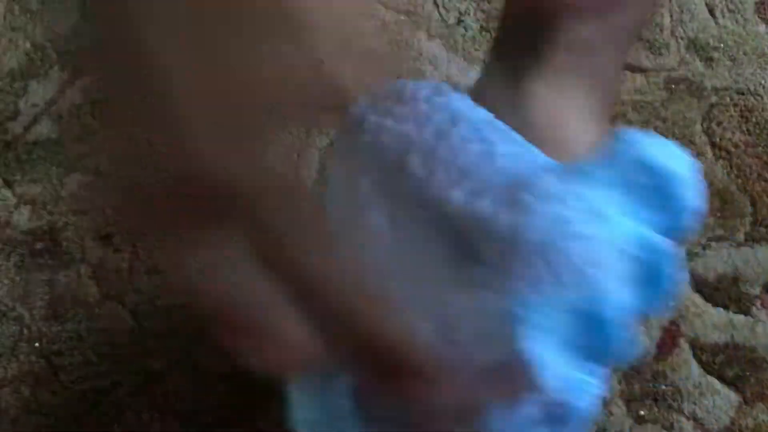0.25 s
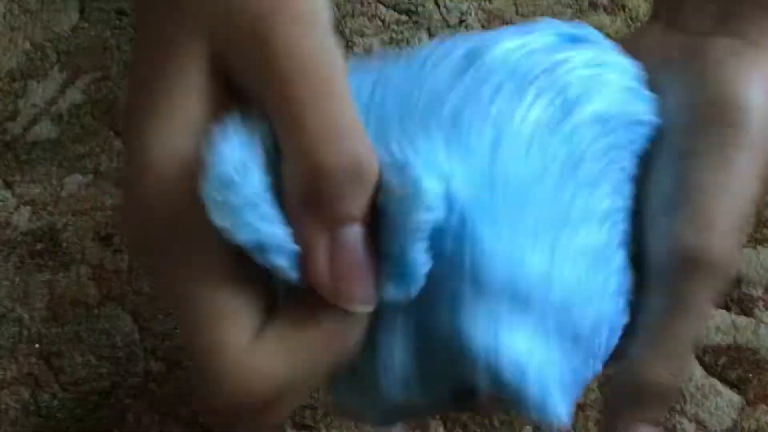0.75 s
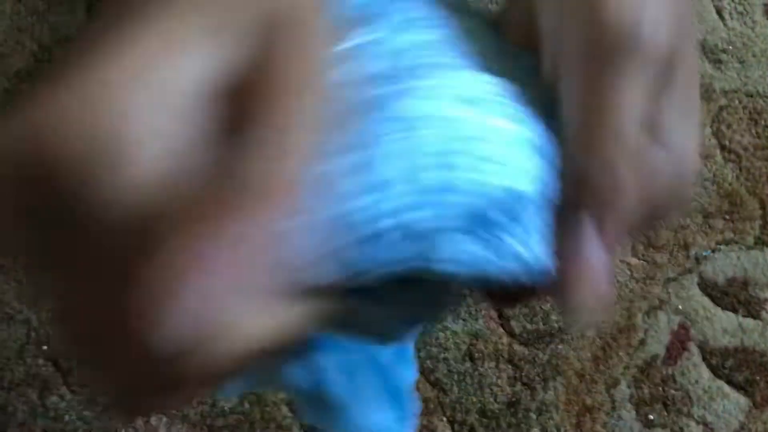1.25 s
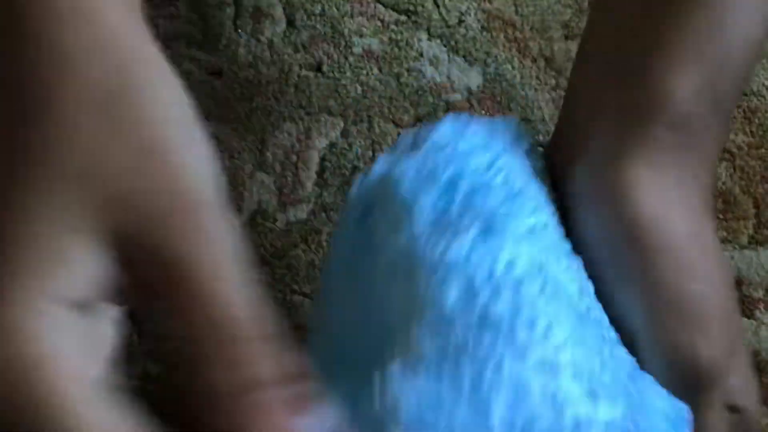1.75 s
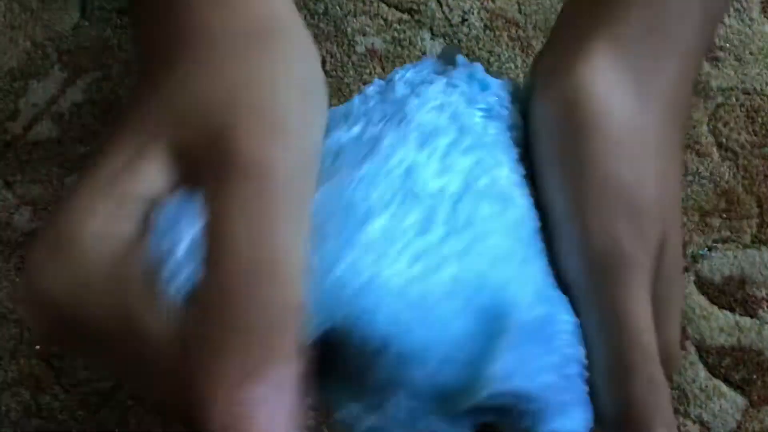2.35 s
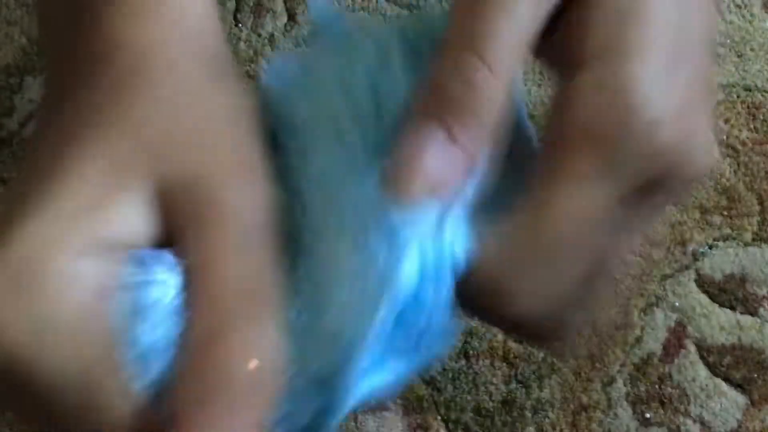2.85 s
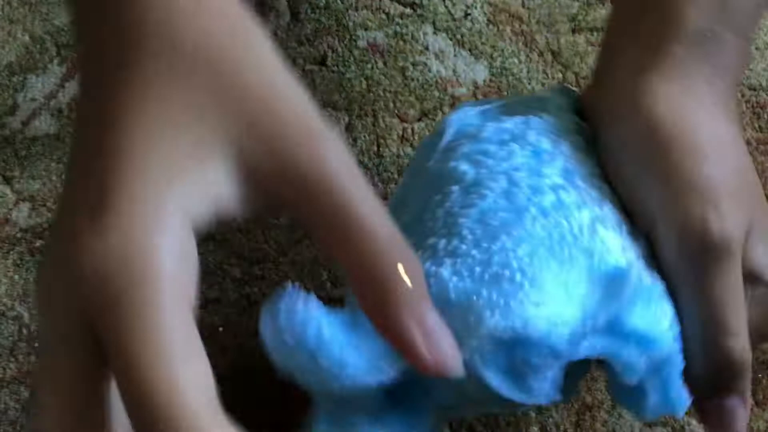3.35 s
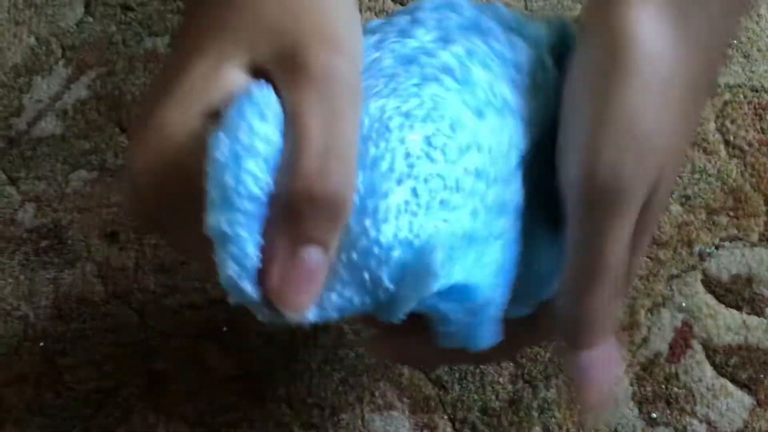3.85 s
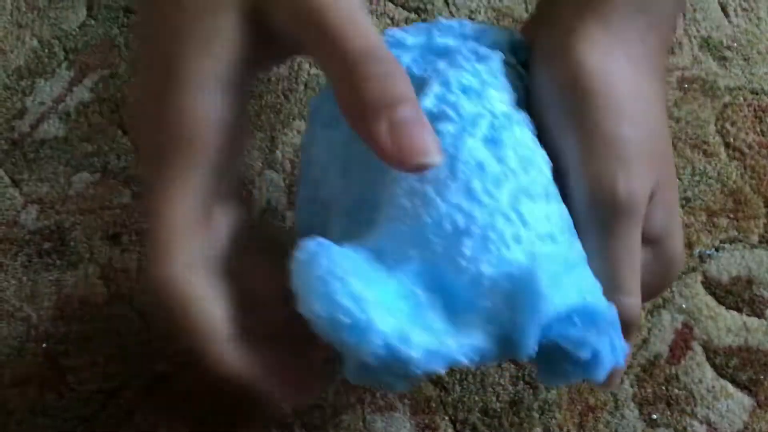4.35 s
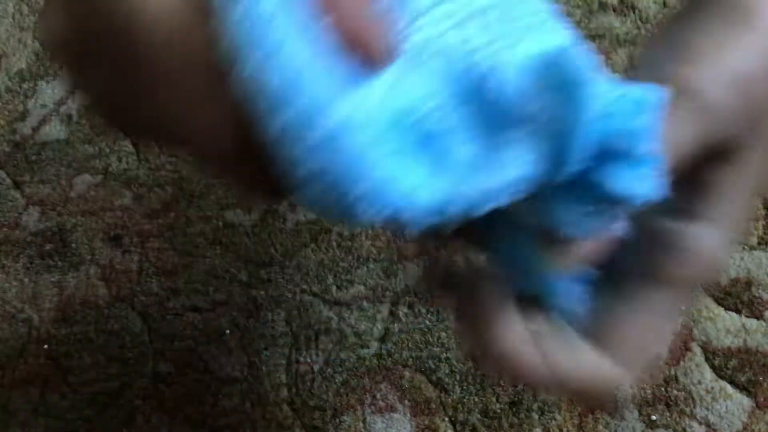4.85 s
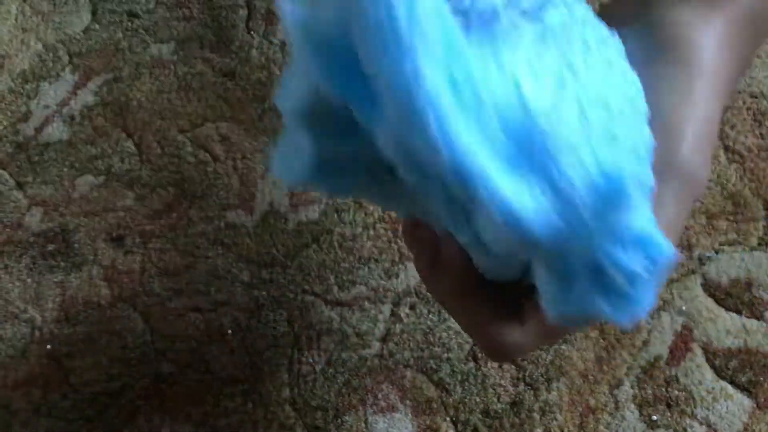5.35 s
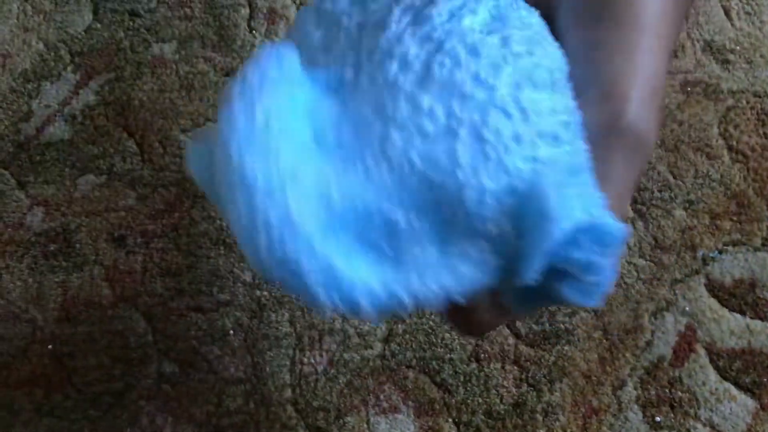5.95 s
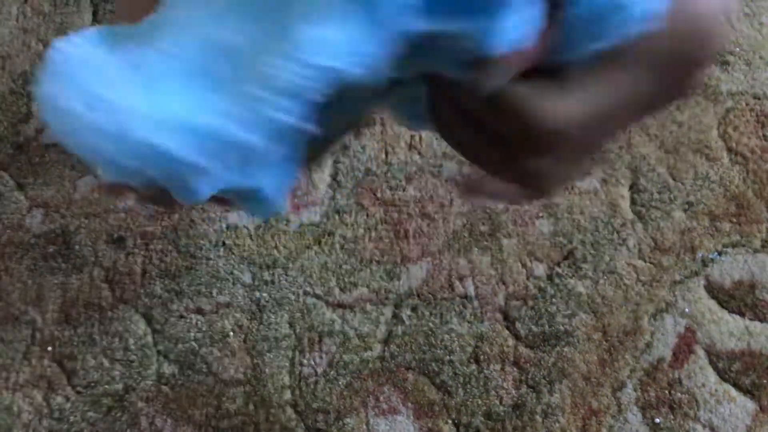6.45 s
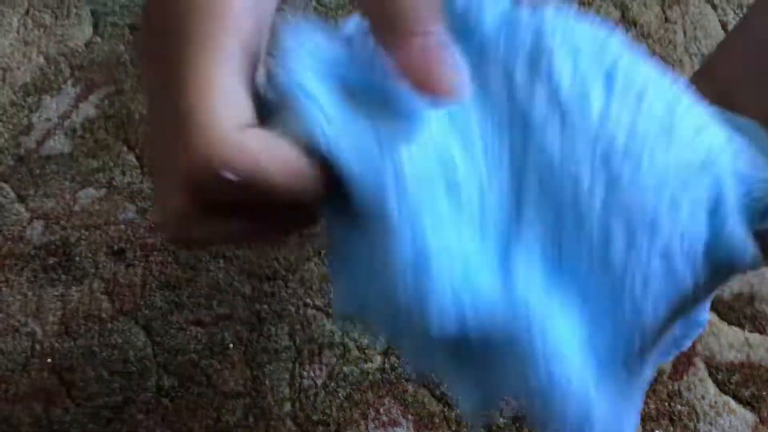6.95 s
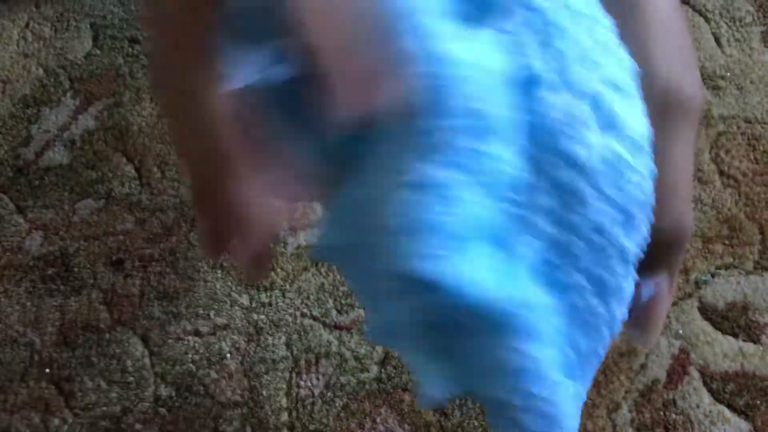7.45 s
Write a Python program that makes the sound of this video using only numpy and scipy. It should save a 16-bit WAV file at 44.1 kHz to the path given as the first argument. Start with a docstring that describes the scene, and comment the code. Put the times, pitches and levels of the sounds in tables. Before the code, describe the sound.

Close, dry sound of sticky beaded slime being kneaded in a small carpeted room. Each press swells and releases quickly as crackling hiss over wet, gulping squelch. Bright pops come singly and in rapid clusters, with one big air pocket plunging into bass. Later squeezes are softer, a near-still pause follows, then a fresh flurry of snaps fades into light peeling ticks over faint low room tone.

```python
"""A lump of foam slime is kneaded and folded by two hands on a carpet in a quiet room, close to the microphone.
Each squeeze tears many tiny foam cells: random clicks through filter bands crackle and fizz over a soft squelch of gulps.
Larger bubbles snap as filtered pulses with a noise rattle; fingers sinking in give dull, sagging blups.
Air pockets burst as falling sine notes, one big one ending in a deep thump; pinholes squeak. A low room tone runs on.
"""
import sys
import numpy as np
from scipy import signal
from scipy.fft import irfft
from scipy.io import wavfile

SR = 44100
rng = np.random.default_rng(int(sys.argv[2]) if len(sys.argv) > 2 else 0)


def wrap_up_sound(samples):
    """Save the sound to the file named by the first command line argument, as 16-bit audio."""
    columns = np.atleast_2d(samples).T
    # keep every value between -1 and 1, then stretch to whole-number steps
    tamed = np.clip(columns, -1, 1)
    steps = np.round(tamed * 32767).astype(np.int16)
    wavfile.write(sys.argv[1], SR, steps)


N = 340011

# presses and pulls of the hands (2.979: faint crackle around a pinhole squeak): (time of peak [s],
# nominal crackle level [dB], rise [s], release [s], nominal squelch re crackle [dB], nominal fizz re crackle [dB])
SQUEEZES = [(0.043, -50.5, 0.088, 0.11, -0.5, -7), (0.402, -42.5, 0.048, 0.013, 5, -8),
            (0.514, -42.5, 0.099, 0.084, -2.5, -2), (0.814, -44.5, 0.086, 0.049, 0, -7.5),
            (0.898, -50, 0.036, 0.068, -4.5, -6.5), (1.319, -41.5, 0.093, 0.067, -3.5, -4.5),
            (1.362, -51, 0.2, 0.114, -3, 1), (1.622, -46.0, 0.055, 0.038, 1, -8),
            (1.67, -43.5, 0.024, 0.065, 1, -6.5), (1.998, -48.5, 0.051, 0.06, -9.5, -3),
            (2.086, -46, 0.11, 0.05, 0.5, -9.5), (2.219, -52.5, 0.13, 0.19, -8.5, -1.5),
            (2.442, -46.5, 0.0077, 0.076, 0, -6), (2.504, -39.5, 0.055, 0.012, -12.5, -8),
            (2.745, -52.5, 0.029, 0.22, -11, -4), (2.863, -45.5, 0.066, 0.067, -1, -6),
            (2.979, -52.5, 0.015, 0.017, -15, -10), (3.252, -45, 0.12, 0.029, -1.5, -8.5),
            (3.342, -56.5, 0.071, 0.032, 0, -3), (3.619, -48.5, 0.1, 0.14, -1.5, -5.5),
            (3.79, -59, 0.043, 0.044, -2, -0.5), (4.067, -52, 0.075, 0.103, 3.5, -9),
            (4.152, -44.5, 0.067, 0.017, -0.5, -8), (4.577, -52.0, 0.12, 0.174, -6.5, -4.5),
            (4.831, -44.5, 0.072, 0.053, -2.5, -6.5), (5.099, -45, 0.065, 0.058, 0.5, -4.5),
            (5.254, -49, 0.026, 0.018, -4, -3.5), (6.08, -58.5, 0.089, 0.27, -3.5, -4.5),
            (6.509, -43, 0.1, 0.026, 0.5, -3), (6.58, -53.5, 0.15, 0.089, -13, 1.5),
            (6.927, -49.5, 0.063, 0.098, -0.5, -2.5), (7.018, -59, 0.087, 0.039, 4, -1),
            (7.294, -52, 0.14, 0.057, -3.5, -3), (7.399, -57.0, 0.13, 0.22, -2, -7.5),
            (7.73, -49, 0.097, 0.04, -8.5, -2.5)]
# light crackle of the lump just being held; the hands rest for a moment: (time [s], level [dB])
HOLDING_CRACKLE = [(0, -67.5), (0.27, -69), (1.0, -60), (1.85, -67.5), (2.65, -68.5), (3.4, -64.5),
                   (4.95, -76), (5.27, -74), (5.31, -88), (5.93, -85), (6.03, -67), (6.8, -70), (7.55, -71),
                   (7.7, -69)]
# relative spectrum of the squelch: (frequency [Hz], density [dB per Hz])
SQUELCH_SPECTRUM = [(35, -42), (60, -16), (100, -6.5), (160, -4.5), (220, -0.5), (280, 3), (380, -8),
                    (500, -8.5), (700, -27.5), (1400, -42.5)]
# relative spectrum of the crackle before its filters: (frequency [Hz], density [dB per Hz])
CRACKLE_SPECTRUM = [(260, -31), (450, -0.5), (823, -3), (1060, -12.5), (1220, -8), (1660, -6.5), (1800, -5),
                    (2750, -7), (3290, -8.5), (3720, -6.5), (6500, -9.5), (8450, -44), (14300, -120)]
# relative spectrum of the fizz before its filter: (frequency [Hz], density [dB per Hz])
FIZZ_SPECTRUM = [(6000, 8), (7200, -7), (8500, 2), (10000, -1), (12000, -3), (14500, -3.5), (16000, -15.5)]
# how far the rustle turns hollow as the lump is lifted: (time [s], share [0-1])
HOLLOW_SHARE = [(0, 0.24), (2.0, 0), (4.4, 0), (4.8, 0.42), (6.3, 0.6), (6.8, 0.5), (7.7, 0.7)]
# relative spectrum of the room tone: (frequency [Hz], density [dB per Hz])
ROOM_TONE_SPECTRUM = [(24, -48), (40, -20.5), (64, -7.5), (91, -6.5), (167, -5.5), (283, -18.5), (320, -13),
                      (402, -15.5), (503, -13.5), (810, -21.5), (873, -25), (1070, -29.5), (1810, -28),
                      (16000, -40.5)]
# slime peeling off the fingers in small snaps: (start [s], end [s], rate [snaps/s], typical peak [dB])
PEELS = [(0.503, 0.535, 91, -23.5), (0.6, 0.75, 18, -34), (0.902, 1.0, 36, -34.5), (1.19, 1.34, 60, -28),
         (1.419, 1.521, 63, -33), (2.281, 2.31, 110, -25), (2.34, 2.39, 33, -37), (2.553, 2.64, 24, -32),
         (2.722, 2.98, 27, -31), (3.82, 3.9, 42, -42.5), (4.37, 4.5, 30, -37), (4.561, 4.61, 65, -35),
         (6.082, 6.22, 35, -40), (7.023, 7.08, 44, -37), (7.167, 7.7, 14.8, -43.5)]
# loudest bubbles snapping: (time [s], peak of crack [dB], nominal low edge [Hz], nominal high edge [Hz],
# rattle energy re crack before filtering [dB])
LOUD_SNAPS = [(0.0726, -23.5, 1400, 4460, 1.5), (0.2382, -34.5, 3200, 11200, 0),
              (0.353, -36, 1700, 11800, 4), (0.388, -29, 900, 8600, 1), (0.4565, -15.5, 2600, 12500, -8),
              (0.4821, -10.5, 2800, 12500, -21), (0.4973, -13.5, 900, 6540, -1),
              (0.567, -18.5, 3200, 13100, -8), (1.052, -31, 2000, 11800, -1),
              (1.062, -31.5, 2210, 5970, -3), (1.3019, -22.5, 1800, 10500, 7.5),
              (1.3432, -10, 2400, 10700, -13), (1.3554, -9.5, 4100, 13400, -6),
              (1.3599, -8.5, 6300, 14000, -14), (1.3719, -12, 3800, 12700, 0),
              (1.386, -17.5, 1300, 11700, 13.5), (1.3937, -14, 2180, 14100, -11),
              (1.4027, -5.5, 5600, 14900, -7), (1.4136, -14, 6700, 14300, -11),
              (1.461, -19.5, 3450, 6800, -17), (1.4672, -19.5, 4300, 14300, -7),
              (1.559, -34, 1090, 7200, 9.5), (1.6142, -23.5, 990, 2630, -20), (1.736, -25, 1300, 7430, -3),
              (1.7638, -32.5, 3300, 14000, 4.5), (2.178, -7, 2800, 7900, -12.5),
              (2.1909, -22, 1400, 3500, -12), (2.2154, 1.5, 3030, 7740, -11),
              (2.2365, -20.5, 9000, 14500, -9), (2.2611, 1, 1880, 9600, -11),
              (2.372, -28, 2500, 14800, 2.5), (2.6954, -31, 2100, 6200, -13),
              (2.7928, -17, 4700, 13100, -4), (3.303, -23.5, 800, 13600, -0.5),
              (3.3376, -26.5, 1000, 8950, -1), (3.3929, -32.5, 5000, 11200, 7.5),
              (3.6893, -17.5, 1910, 9700, 10), (3.7542, -26, 1500, 13500, 4.5), (3.804, -33, 2870, 9040, 0),
              (4.1695, -30.5, 2110, 4000, -19), (4.198, -25, 2500, 9900, -5),
              (4.2168, -19.5, 2010, 8150, -2.5), (4.316, -39.5, 2000, 5000, 4),
              (4.356, -37.5, 2100, 5800, 6.5), (4.5158, -25, 1900, 4860, -19),
              (4.5424, -22.5, 1900, 4500, -5.5), (4.5647, -25, 2200, 11200, -11.5),
              (4.6644, -23.5, 1900, 11900, 11), (4.6678, -6, 1720, 6380, -6.5),
              (6.029, -33, 1710, 14080, 0), (6.0848, -30, 1490, 5400, -3), (6.0893, -32, 1600, 8800, 2),
              (6.098, -29.5, 1800, 9400, -2), (6.1314, -31, 2400, 13500, -1), (6.16, -29, 2000, 11500, 3),
              (6.219, -20.5, 1700, 11700, -5.5), (6.282, -21, 1580, 9700, -2.5),
              (6.554, -10, 2600, 11000, 3), (6.5665, -20, 1500, 12800, 3.5),
              (6.5871, -24.5, 1400, 11000, 1), (6.615, -18, 9450, 14300, -5), (6.649, -23, 8600, 13400, -4),
              (6.66, -27, 3400, 12600, -1), (6.668, -26, 9400, 14760, 2.5), (7.1705, -34, 1800, 10000, -3),
              (7.4063, -30.5, 1600, 3900, -4.5), (7.479, -41.5, 1400, 2800, 3.5),
              (7.4919, -31.5, 1600, 4130, -7)]
# dull blups as the fingers sink in: (time of peak [s], nominal level [dB], nominal pitch [Hz])
FINGER_BLUPS = [(0.05, -38.5, 230), (0.08, -33.5, 250), (0.358, -36.5, 285), (0.394, -28, 245),
                (1.178, -33.5, 220), (2.067, -25, 278), (2.227, -36, 238), (2.73, -34.5, 249),
                (2.794, -36, 274), (2.864, -30.5, 287), (2.95, -37, 271), (3.181, -32, 257),
                (3.31, -33, 250), (3.512, -42, 258), (3.637, -31.5, 277), (3.757, -38.5, 255),
                (4, -39, 268), (4.82, -32.5, 292), (5.177, -43.5, 245.6), (6.361, -41.5, 276),
                (6.41, -38, 267), (6.445, -45, 297), (7.4, -41, 296)]
# air pockets bursting with a falling gulp: (time [s], level before swell [dB], starting pitch [Hz], length [s])
AIR_POCKETS = [(0.0746, -35.5, 673, 0.013), (0.174, -44, 1210, 0.011), (0.311, -45.5, 750, 0.018),
               (0.376, -51, 600, 0.035), (0.572, -44.5, 577, 0.028), (0.629, -51.5, 640, 0.036),
               (1.164, -45.5, 750, 0.044), (1.192, -45, 394, 0.026), (1.561, -38, 1730, 0.0041),
               (2.178, -35.5, 2230, 0.0068), (2.721, -43, 844, 0.013), (3.059, -49, 1060, 0.008),
               (3.3, -31, 1040, 0.008), (3.338, -38, 1390, 0.009), (3.463, -36, 1280, 0.0091),
               (3.502, -44.5, 487, 0.015), (3.689, -32, 1200, 0.011), (4.217, -40.5, 1050, 0.0049),
               (4.668, -33, 1086, 0.0085), (5.2353, -32.5, 1100, 0.0026), (6.2195, -41, 1260, 0.01),
               (6.441, -42.5, 800, 0.0093), (6.489, -36.5, 800, 0.0093), (6.555, -37.5, 1730, 0.0093),
               (6.725, -54.5, 735, 0.017), (6.262, -48, 690, 0.015), (7.009, -48.5, 800, 0.036),
               (7.025, -48, 700, 0.016), (7.05, -51, 593, 0.029), (7.072, -50, 402, 0.024)]
# air squeaking out through pinholes: (time [s], level before swell [dB], starting pitch [Hz],
# time for the pitch to halve [s], length [s])
PINHOLE_SQUEAKS = [(0.4987, -21.5, 756, 0.032, 0.0028), (1.437, -43.5, 745, 0.6, 0.0078),
                   (2.497, -34.5, 894, 0.14, 0.0097), (2.917, -42, 1500, 0.003, 0.005),
                   (2.98, -33, 2200, 0.014, 0.003), (2.982, -31.5, 1590, 0.25, 0.0084),
                   (2.9806, -38.5, 3560, 0.025, 0.0045), (3.2999, -26, 2000, 0.047, 0.0024),
                   (3.69, -28, 7900, 0.062, 0.008), (3.7513, -18.5, 12700, 0.1, 0.0012),
                   (3.752, -33.5, 1630, 0.081, 0.0027), (3.753, -36, 736, 0.5, 0.0088),
                   (5.247, -46, 830, 0.02, 0.0053), (5.257, -47, 1060, 0.053, 0.008),
                   (5.4, -62, 510, 0.15, 0.13)]


def from_db(db):
    """Decibels to gain."""
    return 10 ** (np.asarray(db) / 20)


def rms_one(x):
    """Scale to unit rms."""
    return x / np.sqrt(np.mean(x ** 2) + 1e-20)


def curve(rows):
    """Interpolate a (time, value) table to every sample."""
    time_s, value = np.transpose(rows)
    return np.interp(np.arange(N) / SR, time_s, value)


def at_hz(spectrum, hz):
    """Read a spectrum on a log-frequency axis."""
    table_hz, table_db = np.transpose(spectrum)
    return np.interp(np.log(hz), np.log(table_hz), table_db)


def cut(x, hz, kind, order=2):
    """Causal Butterworth filter."""
    return signal.sosfilt(signal.butter(order, hz, kind, fs=SR, output="sos"), x)


def add(out, start_s, sound):
    """Mix in a short sound at start_s."""
    i = int(np.clip(round(start_s * SR), 0, N - 1))
    out[i:i + len(sound)] += sound[:N - i]


def drift(per_s):
    """Random wander of spread about 1, with per_s new targets a second."""
    targets = rng.standard_normal(N // 20)
    return np.interp(np.arange(N) / SR * per_s, np.arange(len(targets)), targets)


def bursts(per_s, size_db):
    """Cells burst at random, many small and a few large; unit power at any rate."""
    born = rng.random(N) < per_s / SR
    sizes = from_db(size_db * np.minimum(rng.exponential(1, N), 4))
    return rms_one(born * sizes / np.sqrt(per_s))


def coloured(clicks, spectrum, low_hz, high_hz, count, patchy_db):
    """Noise-signed clicks strike a bank of bands of wandering strength, so each grain has its own colour."""
    out = np.zeros(N)
    edges_hz = np.geomspace(low_hz, high_hz, count + 1)
    for band_low_hz, band_high_hz in zip(edges_hz, edges_hz[1:]):
        strength = from_db(patchy_db * np.minimum(drift(per_s=130), 2))
        struck = clicks * rng.standard_normal(N) * strength
        band = cut(struck, [band_low_hz, band_high_hz], "band")
        out += from_db(at_hz(spectrum, np.sqrt(band_low_hz * band_high_hz))) * band
    return rms_one(out)


def kneading():
    """Squeezes swell and let go over holding, as powers: squelch dB, crackle dB, fizz dB re crackle."""
    drop_db, shape = 10.0, 1.5   # fall one rise or release time from the peak; power of that fall
    squelch_trim_db, crackle_trim_db, fizz_trim_db = -0.3, -0.6, 0.7
    held_squelch_db, held_fizz_db = -4.5, -4.5   # re the held crackle
    t = np.arange(N) / SR
    held_db = curve(HOLDING_CRACKLE)
    power = from_db([held_db + held_squelch_db, held_db, held_db + held_fizz_db]) ** 2
    for peak_s, db, rise_s, release_s, squelch_db, fizz_db in SQUEEZES:
        near = slice(*np.searchsorted(t, [peak_s - .6, peak_s + .6]))
        away = np.maximum((peak_s - t[near]) / rise_s, (t[near] - peak_s) / release_s)
        swell = from_db(db - drop_db * np.abs(away) ** shape)
        gains = from_db([squelch_db + squelch_trim_db, crackle_trim_db, fizz_db + fizz_trim_db])
        power[:, near] += np.outer(gains, swell) ** 2
    squelch_db, crackle_db, fizz_db = 10 * np.log10(power)
    return squelch_db, crackle_db, fizz_db - crackle_db


def squelch(per_s=110, size_db=2.7):
    """Small air pockets give way all through the lump, each a short falling gulp: its low tones come late."""
    out, size = np.zeros(N), 8192
    hz = np.maximum(np.fft.rfftfreq(size, 1 / SR), 1)
    for cycles in (1.3, 2.0, 3.0):   # each frequency is delayed by this many of its own cycles
        delay = np.exp(-2j * np.pi * cycles * np.log(hz))
        gulp = irfft(from_db(at_hz(SQUELCH_SPECTRUM, hz)) * delay)
        grains = bursts(per_s, size_db) * rng.choice([-1, 1], N)
        out += signal.fftconvolve(grains, np.roll(gulp, size // 2), "same")
    return rms_one(out)


def tearing_cells(effort_db):
    """The harder the squeeze, the more cells tear each second: lone ticks merge into a crackling hiss."""
    per_s = np.clip(3200 * from_db(effort_db), 150, 12000)
    ticks = bursts(per_s, size_db=2.5) * from_db(3.2 * np.minimum(drift(per_s=150), 1.4))
    return np.hypot(ticks, .28)   # the smallest cells blur into a smooth hiss


def crackle(tearing, effort_db, squelch_db):
    """Stretching only tears the small surface cells; a deep squeeze bursts the large, low ones too."""
    grains = coloured(tearing, CRACKLE_SPECTRUM, 463, 6120, count=12, patchy_db=3.0)
    grains = cut(grains, 7000, "low", order=4)
    depth = np.clip(2.5 + 0.025 * effort_db + 0.05 * (squelch_db + 33), .2, 1.4)
    large = signal.sosfiltfilt(signal.butter(2, 1300, fs=SR, output="sos"), grains)
    return rms_one(grains + (depth - 1) * large)


def fizz(tearing):
    """The same tearing cells excite the high treble bands."""
    grains = coloured(tearing, FIZZ_SPECTRUM, 6270, 16500, count=6, patchy_db=0.1)
    return cut(grains, 5200, "high", order=4)


def foam():
    """Squelch, crackle and fizz follow the hands."""
    squelch_db, crackle_db, fizz_db = kneading()
    effort_db = crackle_db + 47
    tearing = tearing_cells(effort_db)
    rustle = crackle(tearing, effort_db, squelch_db) + from_db(fizz_db) * fizz(tearing)
    return from_db(squelch_db) * squelch() + from_db(crackle_db) * rustle


def hollowed(x, notch_hz=7100, spread=1.25):
    """Sound glancing off the hands cancels one treble band of the direct rustle."""
    band = cut(x, [notch_hz / spread, notch_hz * spread], "band", order=1)
    return x - curve(HOLLOW_SHARE) * band


def room_tone(level_db=-63):
    """Steady low tone of the room: noise through bands of wandering strength."""
    return from_db(level_db) * coloured(np.ones(N), ROOM_TONE_SPECTRUM, 54, 16500, count=16, patchy_db=3.3)


def small_snaps():
    """Rows of PEELS and SQUEEZES pop bubbles of chance size at uneven moments; returns rows like LOUD_SNAPS."""
    centre_low_hz, centre_high_hz, centre_rattle_db = 2600, 11000, -9
    spread_db, low_spread_octaves, high_spread_octaves = 6.5, 1, 0.23
    squeeze_snaps_per_s, squeeze_snap_db = 45, 9.5   # typical peak over the nominal crackle level
    pressed = [(s - rise_s / 2, s + release_s / 2, squeeze_snaps_per_s, db + squeeze_snap_db)
               for s, db, rise_s, release_s, _, _ in SQUEEZES]
    rows = []
    for start_s, end_s, per_s, db in [*PEELS, *pressed]:
        chance = rng.uniform(-1, 1, (30, 5))
        for k, (when, strength, low, high, rattle) in enumerate(chance):
            snap_s = start_s + (k + .5 + .5 * when) / per_s
            if snap_s < min(end_s, N / SR):
                low_hz = centre_low_hz * 2 ** (low_spread_octaves * low)
                high_hz = centre_high_hz * 2 ** (high_spread_octaves * high)
                rattle_db = centre_rattle_db + spread_db * rattle
                rows.append((snap_s, db + spread_db * strength, low_hz, high_hz, rattle_db))
    return rows


def snaps(rattle_s=0.0011, flutter_s=0.01, flutter_db=-20, low_scale=0.79, high_scale=1.012):
    """A film breaks in one sharp pulse, then the torn skin rattles for a few milliseconds."""
    out, t = np.zeros(N), np.arange(2048) / SR
    dying = np.exp(-t / rattle_s) + from_db(flutter_db) * np.exp(-t / flutter_s)
    dying *= t > .00025
    dying /= np.linalg.norm(dying)
    noises = rng.standard_normal((400, len(t)))
    for (s, db, low_hz, high_hz, rattle_db), noise in zip([*LOUD_SNAPS, *small_snaps()], noises):
        pair = np.array([t == 0, from_db(rattle_db) * noise * dying])
        # bubble size sets the low edge, tear speed the high edge
        pair = cut(pair, low_hz * low_scale, "high", order=3)
        crack, rattle = cut(pair, high_hz * high_scale, "low", order=3)
        add(out, s, from_db(db) * (crack + rattle) / np.abs(signal.hilbert(crack)).max())
    return out


def blups(rise_s=0.0055, fall_s=0.0072, sag_per_s=9.0, trim_db=-1.0):
    """The lump rings for a few cycles, sagging in pitch, as air shifts inside it."""
    out, t = np.zeros(N), np.arange(-SR // 50, SR // 20) / SR
    for peak_s, db, hz in FINGER_BLUPS:
        swell = np.exp(-(t / np.where(t < 0, rise_s, fall_s)) ** 2)
        phase = 2 * np.pi * np.cumsum(hz * np.exp(-sag_per_s * t)) / SR
        add(out, peak_s + t[0], from_db(db + trim_db) * swell * np.sin(phase))
    return out


def falling_notes(rows, lowest_hz=46, attack_s=0.00025):
    """Escaping air rings as a short sine, its pitch falling towards a floor; rows like PINHOLE_SQUEAKS."""
    out, t = np.zeros(N), np.arange(SR // 6) / SR
    for s, db, hz, halving_s, length_s in rows:
        pitch_hz = np.hypot(hz / (1 + t / halving_s), lowest_hz)
        swell = (1 - np.exp(-t / attack_s)) * np.exp(-(t / length_s) ** 2)
        add(out, s, from_db(db) * swell * np.sin(2 * np.pi * np.cumsum(pitch_hz) / SR))
    return out


def pockets(gulp_cycles=2.4):
    """The air in a burst pocket rings; its pitch falls as the cavity swells, sooner in small pockets."""
    # gulp_cycles: starting pitch times the time for it to halve
    return falling_notes([(s, db, hz, gulp_cycles / hz, length_s) for s, db, hz, length_s in AIR_POCKETS])


def lump_wobble(air, lump_hz=88, level_db=-2.5):
    """The whole lump wobbles along with the deepest notes."""
    return from_db(level_db) * cut(air, [lump_hz / 2.1, lump_hz * 1.6], "band", order=1)


def squeaks():
    """Air squeaks out through pinholes, sagging in pitch."""
    return falling_notes(PINHOLE_SQUEAKS)


def thump(start_s=2.2615, level_db=-14, start_hz=1390, halving_s=0.00083, length_s=0.024):
    """The one big pocket: its note plunges into the deep bass."""
    return falling_notes([(start_s, level_db, start_hz, halving_s, length_s)])


def room(x, t60_s=0.086, wet_db=-21):
    """A carpeted room returns a faint, short tail with little bass and a dull top."""
    t = np.arange(SR // 3) / SR
    tail = rng.standard_normal(len(t)) * from_db(-60 * t / t60_s) * (t > .004)
    tail = cut(cut(tail, 350, "high"), 5500, "low", order=3)
    return x + from_db(wet_db) * signal.fftconvolve(x, tail / np.linalg.norm(tail))[:N]


def scene():
    """The slime in the room, over a steady low room tone."""
    rustle = hollowed(foam())
    air = pockets() + squeaks() + thump()
    slime = rustle + snaps() + blups() + air + lump_wobble(air)
    return (room(slime) + room_tone())[None]


def record(dry, bass_cut_hz=32, peak_limit=.85, top_cut_hz=16200):
    """The microphone loses the deepest bass; peaks of the hardest snaps are limited; the top is cut steeply."""
    limited = np.clip(cut(dry, bass_cut_hz, "high"), -peak_limit, peak_limit)
    return signal.sosfilt(signal.ellip(10, .1, 80, top_cut_hz, fs=SR, output="sos"), limited)


dry = scene()
out = record(dry)
wrap_up_sound(out)
```